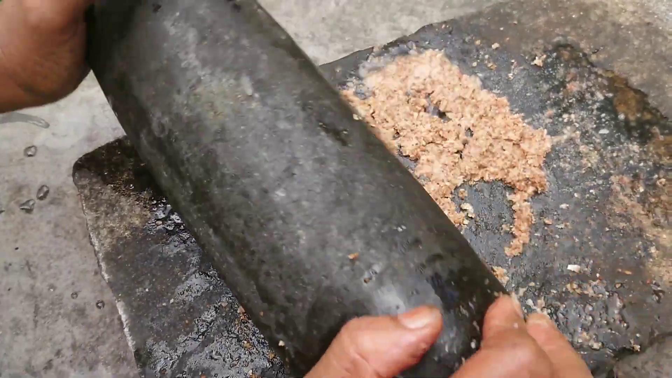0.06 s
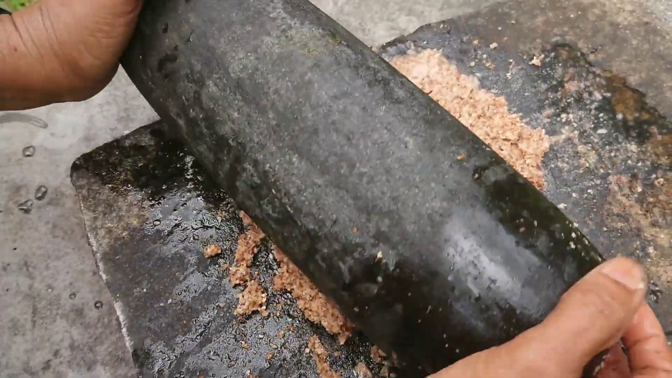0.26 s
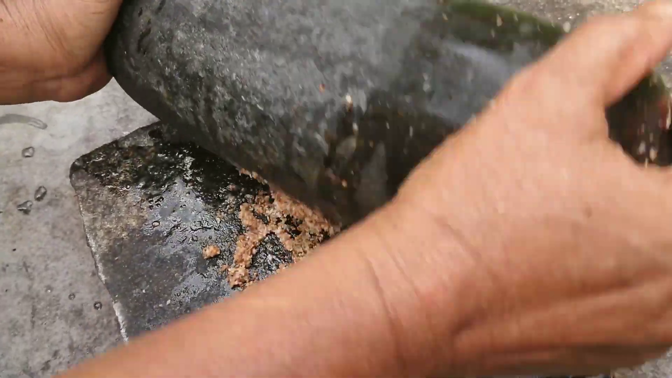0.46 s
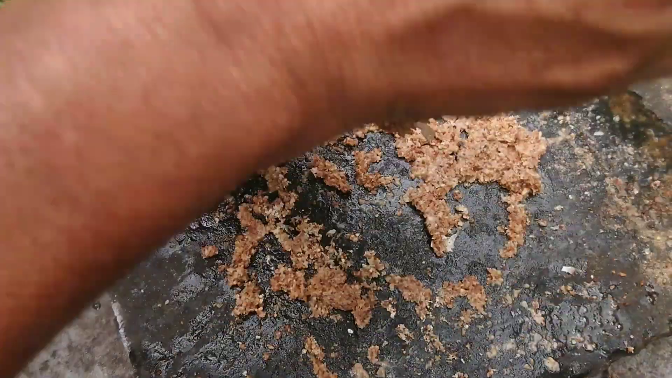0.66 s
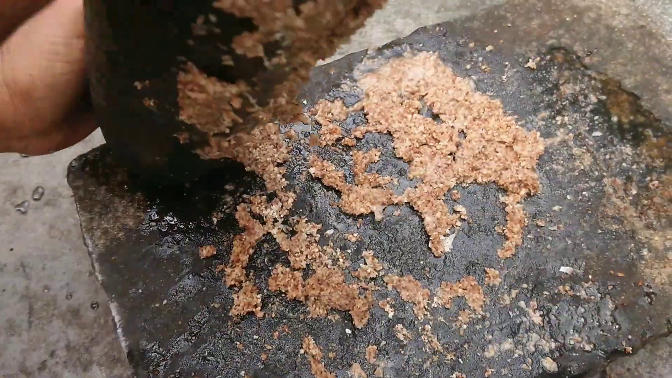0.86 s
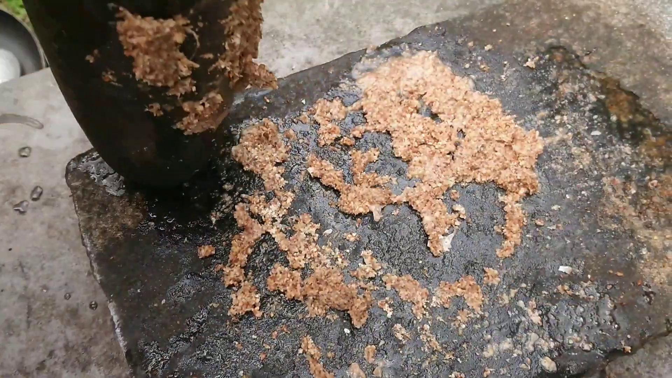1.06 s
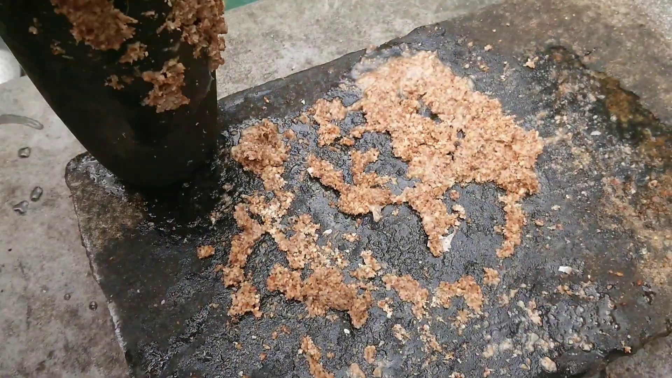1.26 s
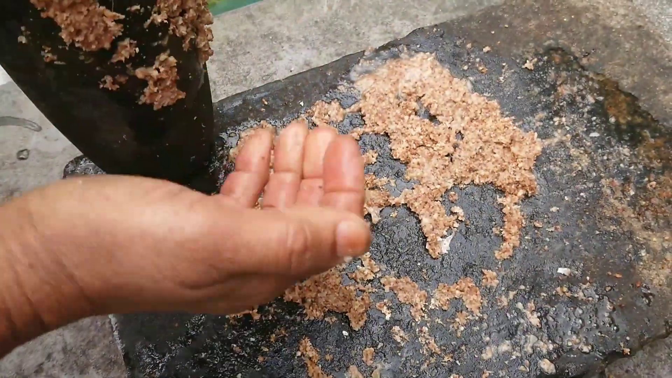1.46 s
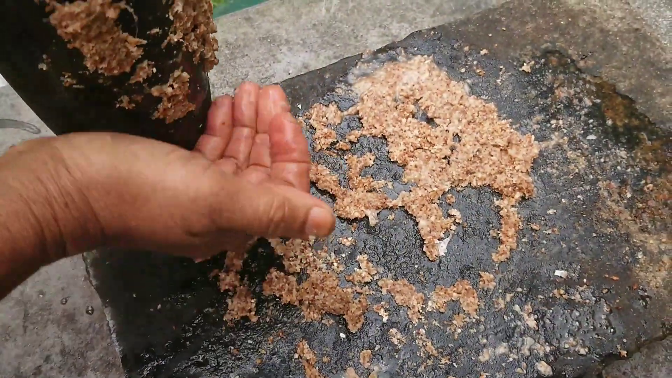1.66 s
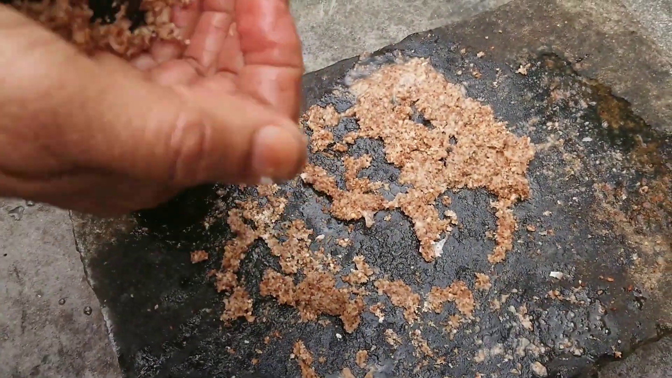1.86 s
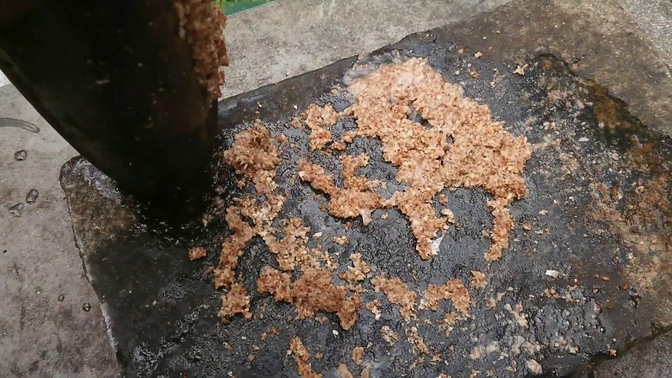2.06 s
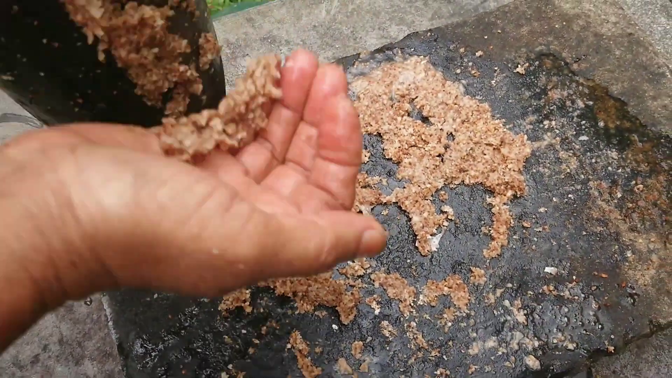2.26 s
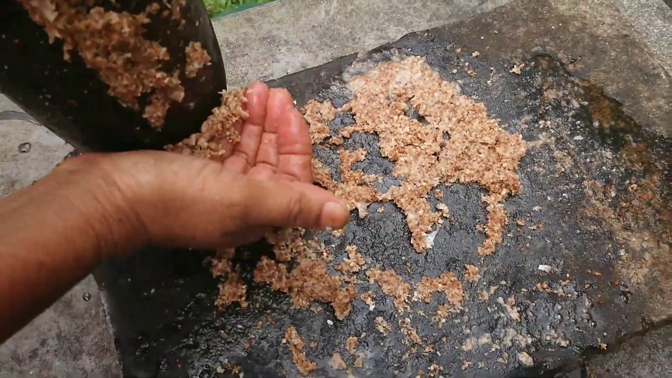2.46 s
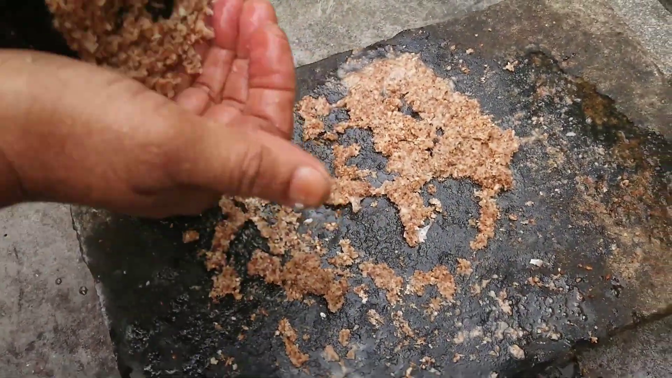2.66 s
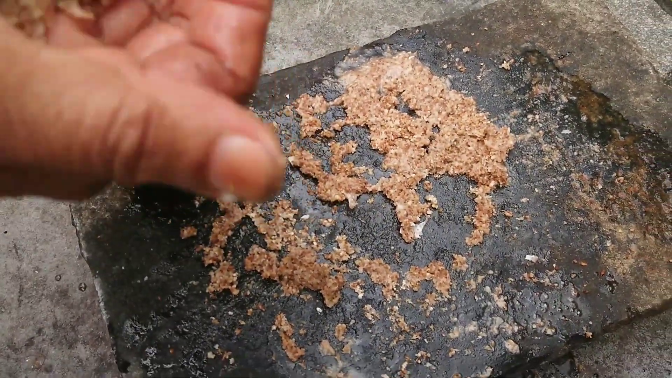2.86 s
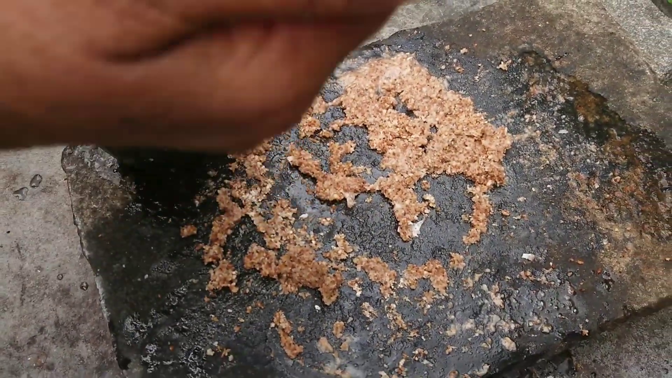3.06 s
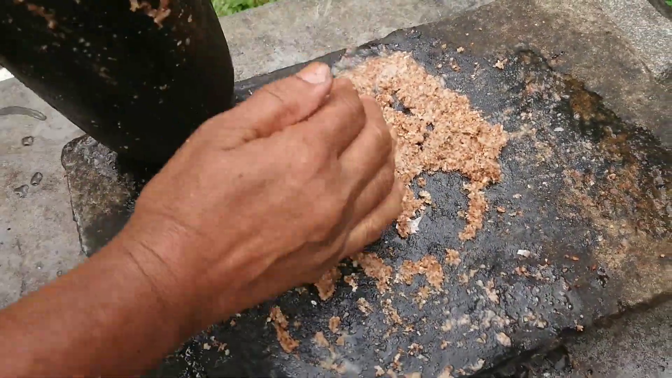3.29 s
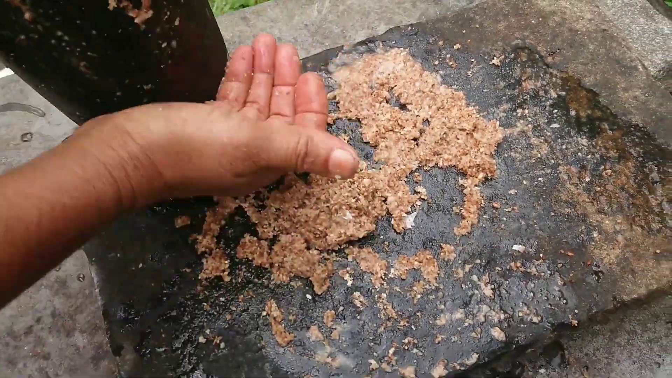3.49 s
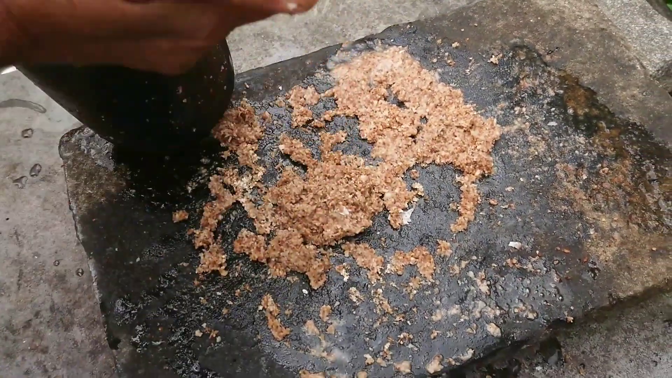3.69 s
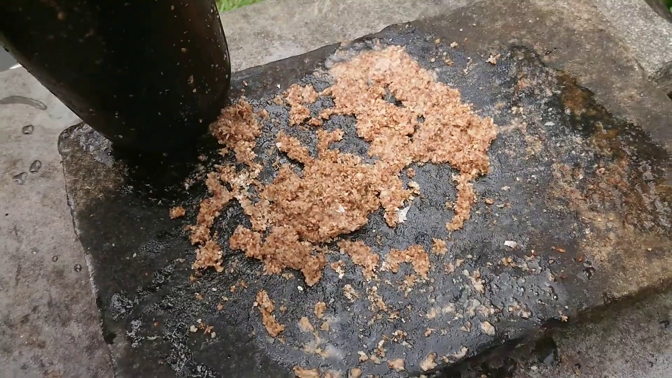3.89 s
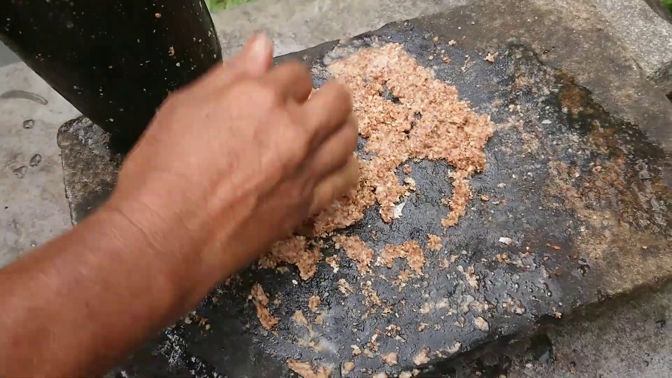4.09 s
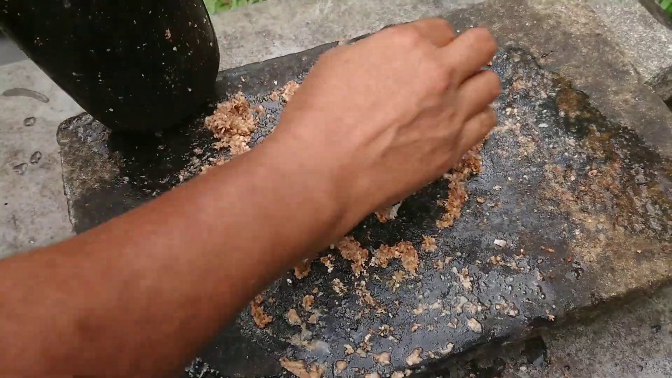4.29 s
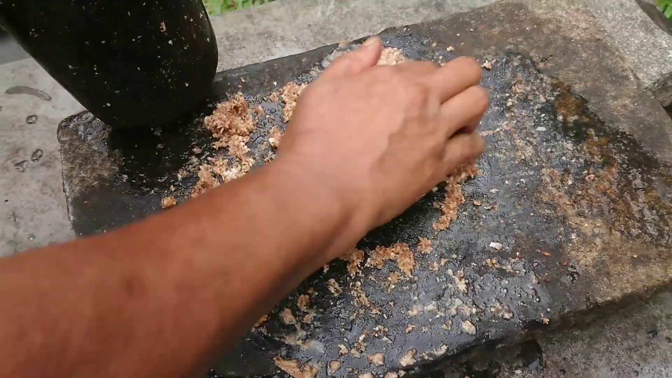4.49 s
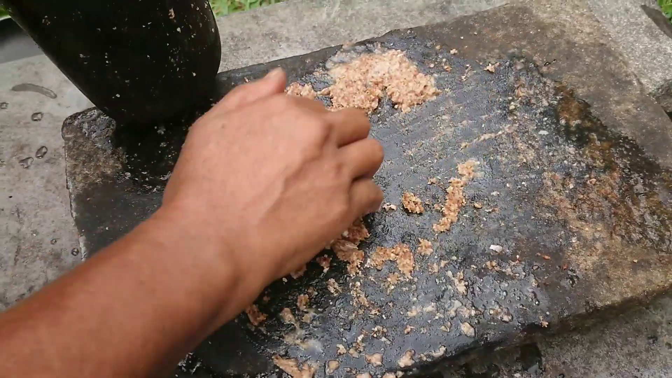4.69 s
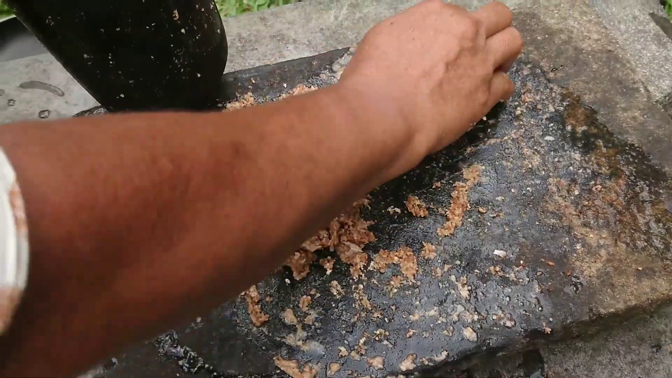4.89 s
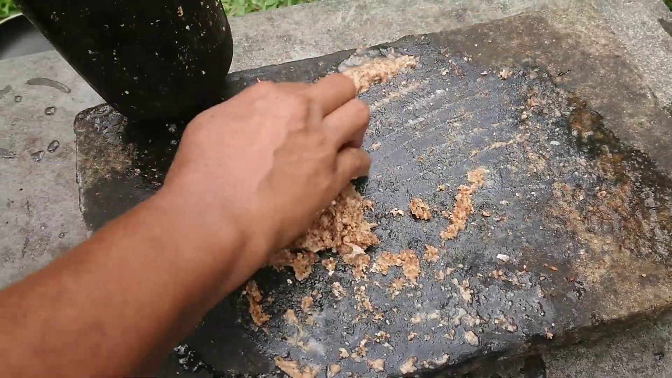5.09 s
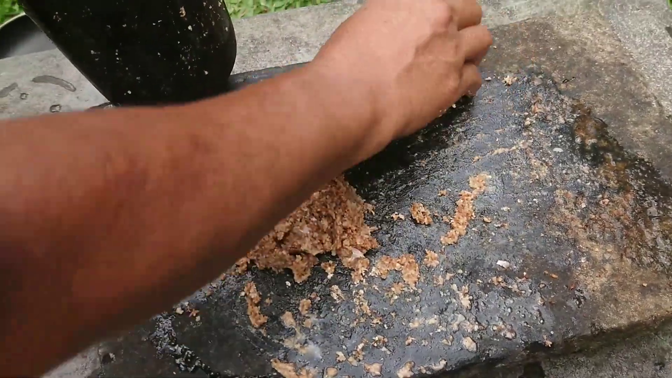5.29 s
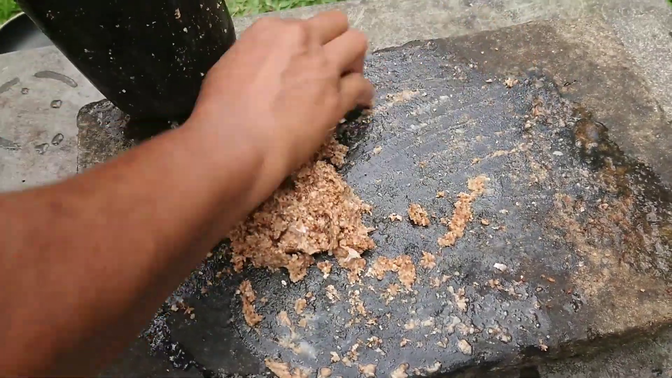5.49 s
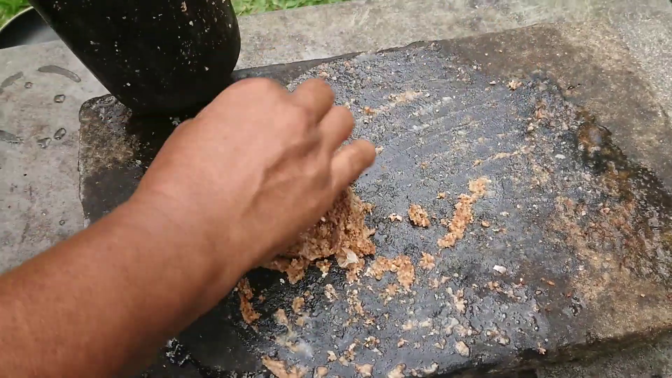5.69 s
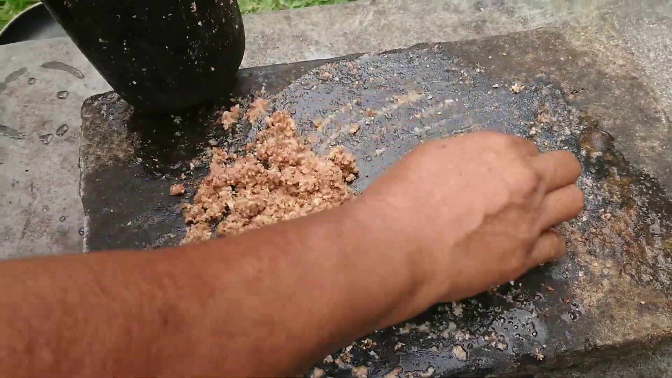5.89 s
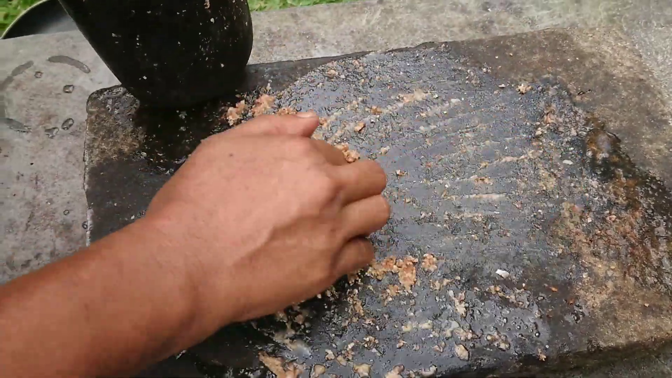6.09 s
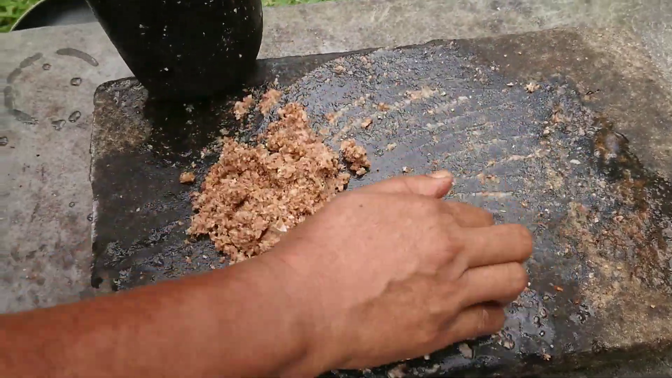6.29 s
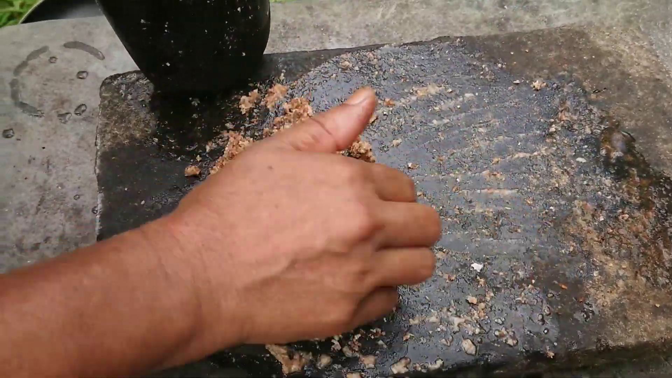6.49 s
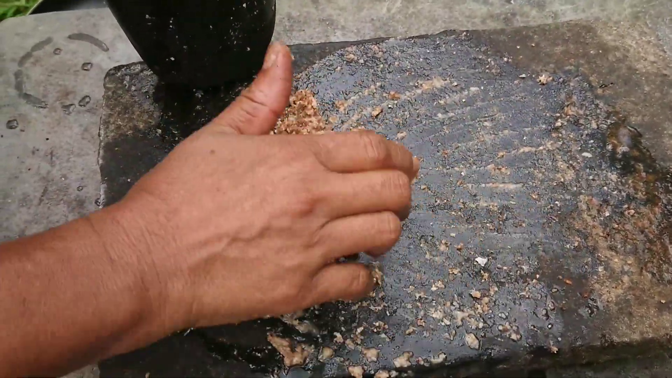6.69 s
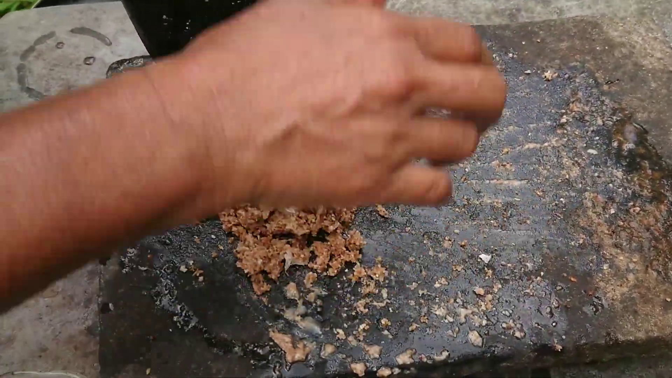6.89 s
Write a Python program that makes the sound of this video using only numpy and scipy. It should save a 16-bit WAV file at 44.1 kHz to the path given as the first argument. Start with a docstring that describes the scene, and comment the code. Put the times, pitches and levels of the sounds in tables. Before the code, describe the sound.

A stone roller scrapes and knocks dully on a slab, then a hand wipes up wet, gritty paste outdoors amid hissing insects.

```python
"""Outdoors, at a stone slab, heard close up through the two microphone ports of a phone.
A stone roller grinds wet paste, drags as it is tipped up and is set on end with a few dull knocks,
the stones ringing briefly. A hand wipes the paste off and sweeps it together, squelching and gritty.
Moving air buffets the left port. Insects hiss all around; far off, one rasps and a bird calls
over a low rumble and hush."""
import sys
import numpy as np
from scipy import signal
from scipy.fft import rfft, irfft
from scipy.io import wavfile
from scipy.ndimage import uniform_filter1d

SR = 44100
rng = np.random.default_rng(int(sys.argv[2]) if len(sys.argv) > 2 else 0)


def to_wav(s):
    """Save 16-bit WAV."""
    ch = np.atleast_2d(s).T  # columns
    pcm = np.round(np.clip(ch, -1, 1) * 32767)  # PCM
    wavfile.write(sys.argv[1], SR, pcm.astype(np.int16))


N = 306435
T = np.arange(N) / SR
FREQS = np.fft.rfftfreq(N, 1 / SR)


def undb(db):
    """Decibels to gain."""
    return 10 ** (np.asarray(db) / 20)


def unit(x):
    """Scale to rms 1."""
    return x / np.sqrt(np.mean(x ** 2))


def response(points, freqs):
    """Gain of a (Hz, dB) spectrum at the given frequencies."""
    hz, db = np.transpose(points)
    return undb(np.interp(np.log(freqs + 1), np.log(hz), db))


def colour(x, gain):
    """Filter by a gain per frequency, to rms 1."""
    return unit(irfft(rfft(x) * gain, len(x)))


def cut(x, hz, kind, order=2):
    """Low-pass or high-pass."""
    return signal.sosfilt(signal.butter(order, min(hz, .45 * SR), kind, fs=SR, output="sos"), x)


def resonate(x, hz, width_hz):
    """Ring a resonance whose centre may glide, to rms 1."""
    turn = np.exp(2j * np.pi * np.cumsum(hz * np.ones(len(x))) / SR)
    return unit(np.real(cut(x / turn, width_hz / 2, "low") * turn))


def noise():
    """White noise."""
    return rng.standard_normal(N)


def walk(hz):
    """A random wander of rms 1, mostly slower than hz."""
    return colour(noise(), np.exp(-(FREQS / hz) ** 2))


def grains(per_s, spread_db, size=N):
    """Random tiny clicks of uneven strength."""
    chance, sign, loud = rng.random(size), rng.standard_normal(size), rng.standard_normal(size)
    return unit((chance < per_s / SR) * np.sign(sign) * undb(spread_db * np.clip(loud, -2, 2)))


def held(start, end, attack_s, release_s):
    """Rise from the start, hold to the end, then fall silent."""
    return np.clip((T - start) / attack_s, 0, 1) * np.clip(1 - (T - end) / release_s, 0, 1)


def progress(start, end):
    """From 0 to 1 over a gesture, one value a sample."""
    return np.linspace(0, 1, int((end - start) * SR))


def add(out, s, x):
    """Mix a short sound in at s seconds."""
    i = max(int(s * SR), 0)
    out[i:i + len(x)] += x[:N - i]


def ports(x, right_db, slant=1):
    """Sound bends round the phone to the right port; the lag grows with its slant to the left."""
    # Each row: frequency in Hz, phase lag at the right port in radians, gain there in dB.
    body_shadow = [(20, 1.5, -14), (250, 0, -6.5), (473, 0.5, -7), (820, 0.97, 0.5), (1070, 1.4, -12),
                   (1584, 3, -2), (2150, 5, -4), (2820, 4, -6.5), (3280, 10, -0.5), (5400, 14, -4.5),
                   (10100, 19, -9), (16200, 29, -3)]
    hz, lag, db = np.transpose(body_shadow)
    gain = undb(right_db + np.interp(FREQS, hz, db))
    delay = np.exp(-1j * slant * np.interp(FREQS, hz, lag))
    return np.array([x, irfft(rfft(x) * gain * delay, N)])


def outdoors(db=-49.5, right_db=-4, shared_hz=550, shade_hz=1100, swell_db=1, patchy_db=1.5):
    """Far rumble, alike at both ports, under a diffuse hush whose bands swell and fade on their own."""
    # The distant background. Each row: frequency in Hz, level in dB.
    hush = [(20, -38), (35, -25.5), (55, 7.5), (90, -1), (160, -10.5), (300, -19), (600, -22.5),
            (1100, -25), (1500, -25.5), (2500, -26), (5000, -31), (9500, -32), (12000, -44.5), (16000, -54)]
    shape = unit(response(hush, FREQS))
    alike = .85 / (1 + (FREQS / shared_hz) ** 4)
    common = np.sqrt(alike) * rfft(noise())
    left, right = (shape * (common + np.sqrt(1 - alike) * rfft(noise())) for _ in range(2))
    pair = np.array([left, right * undb(right_db / (1 + (FREQS / shade_hz) ** 4))])
    half_octaves = 2 * np.log2(np.clip(FREQS, 250, 8000) / 250)
    bands = (irfft(pair * np.maximum(1 - np.abs(half_octaves - k), 0), N) for k in range(11))
    return undb(db + swell_db * walk(4.4)) * sum(band * undb(patchy_db * walk(16)) for band in bands)


def bird(blur=0.53, third_db=-12, waver=0.016):
    """Soft, wavering calls from far off; mostly the second harmonic carries, its level blurred."""
    # Each row: start and end in seconds, first and last fundamental in Hz, level in dB.
    calls = [(1.1, 1.22, 707, 710, -64.5), (2.372, 2.47, 710, 720, -72), (6.077, 6.292, 589, 578, -61),
             (6.627, 6.848, 627, 597, -54)]
    out = np.zeros(N)
    drift = 1 + waver * walk(70)
    for start, end, first_hz, last_hz, db in calls:
        u = np.clip((T - start) / (end - start), 0, 1)
        phase = 2 * np.pi * np.cumsum((first_hz + (last_hz - first_hz) * u) * drift) / SR
        out += undb(db) * np.sin(np.pi * u) * (np.sin(2 * phase) + undb(third_db) * np.sin(3 * phase))
    return ports(out * (1 + blur * walk(140)), right_db=8.5, slant=0.67)


def insect_chorus(db=-56.5, flutter_db=1, swell_db=0.17):
    """Insects all around, too dense to tell apart, different at each port."""
    # Their hiss. Each row: frequency in Hz, level in dB.
    hiss = [(5000, -23.5), (5900, -24), (6450, -1), (7100, 3.5), (7600, 0), (8100, -8.5), (9000, -39),
            (11000, -45)]
    shape = response(hiss, FREQS)
    return np.array([colour(noise(), shape) * undb(db + flutter_db * walk(50) + swell_db * walk(0.88))
                     for _ in range(2)])


def rasping_insect(first_hz=3074, waver_hz=30, skirt_db=-7, falter_db=1.5):
    """One far insect, lower than the chorus; each rasp starts on the same pitch, wavers and sinks."""
    # Each row: start and end in seconds, level in dB, sag in Hz per second, bandwidth in Hz.
    rasps = [(-.1, 0.659, -64.5, 35.7, 90), (3.738, 6.0, -63.5, 105, 270)]
    out = np.zeros((2, N))
    waver, effort = waver_hz * walk(7.2), undb(falter_db * walk(20))
    for start, end, db, sag, width_hz in rasps:
        envelope = effort * held(start, end, attack_s=0.042, release_s=0.4)
        span = envelope > 0
        hz = (first_hz - sag * (T - start) + waver)[span]
        rasp = [resonate(x, hz, width_hz) + undb(skirt_db) * resonate(x, hz, 4 * width_hz)
                for x in rng.standard_normal((2, len(hz)))]
        out[:, span] += undb(db) * envelope[span] * unit(np.array(rasp))
    return out


def wind(right_db=-20, port_hz=62, fitful_db=3, puff_db=-2):
    """Eddies and single puffs press on the left port; the port's low cut makes each puff swing back."""
    # Light air that always stirs. Each row: time in seconds, level in dB.
    light_air = [(0, -38), (.7, -41.5), (1.1, -44.5), (1.45, -62), (1.9, -41.5), (2.25, -52.5), (3, -51),
                 (3.8, -44.5), (4, -60), (5.7, -64), (6.2, -42.5), (6.5, -64), (6.95, -56)]
    # Each row: start and length in seconds, level in dB.
    gusts = [(-.02, 0.025, -17.5), (0.277, 0.094, -24), (0.722, 0.028, -33), (0.919, 0.081, -24.5),
             (1.05, 0.033, -36.5), (1.156, 0.027, -33.5), (1.649, 0.13, -30.5), (1.943, 0.028, -27.5),
             (2.05, 0.082, -38), (2.864, 0.061, -33.5), (3.419, 0.045, -24.5), (3.497, 0.28, -34.5)]
    # Eddies on a port. Each row: frequency in Hz, level in dB.
    eddy_spectrum = [(20, -48), (35, -9.5), (55, 9), (75, 5), (130, -7.5), (200, -17), (320, -37.5),
                     (600, -49), (2000, -62)]
    # Single puffs. Each row: time in seconds, relative level in dB, cut-off in Hz.
    buffets = [(.003, -14, 236), (0.236, -30, 260), (0.335, -16.5, 199), (0.362, -15, 176),
               (0.461, -32.5, 119), (0.985, -12, 202), (1.008, -22.5, 100), (1.313, -31, 242),
               (1.682, -19, 174), (1.72, -25, 120), (1.757, -23.5, 169), (1.895, -36, 159),
               (1.96, -25.5, 250), (1.97, -17, 280), (2.038, -40, 480), (2.36, -32.5, 166),
               (2.539, -37, 150), (2.679, -32.5, 115), (2.885, -38, 188), (3.098, -31, 130),
               (3.282, -30, 109), (3.438, -21.5, 137), (3.453, -20.5, 169), (3.588, -21, 190),
               (3.737, -27, 162), (6.115, -30, 108), (6.163, -36, 110), (6.227, -24.5, 123)]
    stir = undb(np.interp(T, *np.transpose(light_air)) + fitful_db * walk(25))
    gusting = sum(undb(db) * held(s, s + length, attack_s=0.0093, release_s=0.025)
                  for s, length, db in gusts)
    strength = np.hypot(stir, gusting)
    eddies = np.array([colour(noise(), response(eddy_spectrum, FREQS)) for _ in range(2)])
    eddies /= np.sqrt(uniform_filter1d(eddies ** 2, SR // 25, axis=1))  # even out their own swells
    puffs = np.zeros(N)
    for s, db, hz in buffets:
        push = cut(signal.unit_impulse(SR // 8), hz, "low", order=5)
        puff = cut(push, port_hz, "high", order=3)
        add(puffs, s - .003, undb(puff_db + db) * puff / np.abs(puff).max())
    return np.array([strength * eddies[0] + puffs, undb(right_db) * strength * eddies[1]])


def crumbs(size, tilt_db, spread_db):
    """Countless wet crumbs parting, brighter or duller by the tilt in dB per octave."""
    # Wet paste. Each row: frequency in Hz, level in dB.
    paste_spectrum = [(200, 8), (600, -3.5), (1300, -1), (1850, -2.5), (2500, 0.5), (4000, -1.5),
                      (5200, -3.5), (7000, 2), (9500, 1), (12000, -4.5), (16000, -10)]
    freqs = np.fft.rfftfreq(size, 1 / SR)
    gain = response(paste_spectrum, freqs) * undb(tilt_db * np.log2((freqs + 100) / 4000))
    return colour(grains(per_s=7000, spread_db=spread_db, size=size), gain)


def grit(crumb_db=2, ring_width_hz=900):
    """Grit cracks and paste smacks under stone or fingers, each burst with a short ring of its own."""
    # Each row: start in seconds, level in dB, rise in seconds, ring in Hz, relative ring level in dB.
    bursts = [(.09, -39.5, .0014, 8000, -7), (.102, -39.5, 0.0031, 7350, -3),
              (.114, -39, 0.0048, 5560, -10), (0.1233, -41.5, 0.0013, 3680, 3.5),
              (.128, -49, .0012, 3800, -2), (.831, -42, 0.0016, 4400, -14), (3.2588, -49.5, .0008, 3100, 6),
              (3.2642, -46, .0013, 3050, -2), (3.267, -40, 0.0022, 3500, -4),
              (5.034, -48.5, 0.0008, 7000, -4), (6.622, -48.5, 0.00096, 7000, -16),
              (6.825, -49, 0.0028, 9500, -6)]
    out, t = np.zeros(N), T[:SR // 25]
    for s, db, rise_s, ring_hz, ring_db in bursts:
        crack = crumbs(len(t), 0, crumb_db)
        ring = undb(ring_db) * resonate(rng.standard_normal(len(t)), ring_hz, ring_width_hz)
        envelope = t / rise_s * np.exp(1 - t / rise_s)
        add(out, s, undb(db) * envelope * (crack + ring))
    return out


def hand(arch_power=0.79, crumb_db=3, sticky_db=1.5, wipe_release_s=0.17):
    """Strokes, wipes and their squelches, all uneven as the skin sticks and lets go."""
    # Short strokes through the paste.
    # Each row: start and end in seconds, level in dB, treble tilt in dB per octave.
    strokes = [(0.05, 0.167, -41.5, -3.5), (0.126, 0.292, -50.5, 0), (0.946, 1.064, -56.5, 5),
               (1.253, 1.363, -55, -2), (2.12, 2.38, -69, 3), (2.972, 3.092, -64, 4),
               (3.224, 3.308, -55.5, 0), (4.497, 4.73, -54, 1), (4.997, 5.172, -58.5, 0),
               (5.468, 5.717, -60, -0.5), (5.99, 6.12, -55.5, 1.5), (6.333, 6.494, -58, -0.5)]
    # Long wipes that gather a handful. Each row: as for a stroke, then growth in dB per second.
    wipes = [(1.7, 1.979, -49, 0.5, 4), (2.545, 2.906, -51, 0.9, 10), (3.55, 3.82, -54, 1, -3)]
    # Pockets between skin, paste and stone ring and change size as the hand slides.
    # Each row: start and end in seconds, first pitch, last pitch and bandwidth in Hz, level in dB.
    squelches = [(1.251, 1.346, 1090, 800, 600, -59.5), (1.257, 1.347, 2520, 2580, 220, -61),
                 (1.255, 1.345, 4680, 4700, 560, -59.5), (1.703, 1.813, 1710, 1230, 260, -53.5),
                 (1.728, 1.842, 2900, 2200, 400, -62), (1.91, 2.083, 5300, 4800, 550, -57),
                 (2.56, 2.86, 1300, 1150, 260, -62), (2.68, 2.94, 2650, 2300, 350, -58.5),
                 (2.658, 2.897, 5500, 4300, 900, -59), (2.858, 2.985, 4200, 4400, 800, -56),
                 (3.569, 3.766, 1590, 1300, 400, -63), (3.76, 3.92, 5000, 4700, 550, -67),
                 (4.52, 4.7, 1950, 2100, 550, -58), (4.527, 4.678, 2930, 3080, 900, -56),
                 (5.0, 5.156, 1570, 1880, 990, -56.5), (5.03, 5.13, 2920, 2900, 700, -54.5),
                 (5.459, 5.68, 1620, 1550, 700, -59), (5.527, 5.668, 2500, 2700, 900, -58.5),
                 (6.331, 6.49, 1400, 1450, 500, -65.5)]
    out = np.zeros(N)
    for start, end, db, tilt_db in strokes:
        u = progress(start, end)
        add(out, start, undb(db) * np.sin(np.pi * u) ** arch_power * crumbs(len(u), tilt_db, crumb_db))
    for start, end, db, tilt_db, growth_db in wipes:
        span = (T >= start) & (T < end + wipe_release_s)
        press = held(start, end, attack_s=0.041, release_s=wipe_release_s)[span] ** 2
        press *= undb(growth_db * (T[span] - (start + end) / 2))
        add(out, start, undb(db) * press * crumbs(len(press), tilt_db, crumb_db))
    for start, end, first_hz, last_hz, width_hz, db in squelches:
        u = progress(start, end)
        squelch = resonate(rng.standard_normal(len(u)), first_hz + (last_hz - first_hz) * u, width_hz)
        add(out, start, undb(db) * np.sin(np.pi * u) ** arch_power * squelch)
    return out * undb(sticky_db * walk(29))


def paste():
    """The wet paste and its grit lie all over the slab, so the lag between the ports keeps shifting."""
    left, right = ports(hand() + grit(), right_db=-0.5, slant=0.47)
    shifting_phase = np.exp(1j * walk(460))
    return np.array([left, np.real(signal.hilbert(right) * shifting_phase)])


def stone_ring(t, rubbed):
    """The stones' modes dying away after one blow or one slip."""
    # Each row: frequency in Hz, level struck and level rubbed in dB, seconds to fall by 60 dB.
    modes = [(225, -66, -7, 0.039), (403, -9, -17, 0.023), (460, -15.5, 1, 0.036), (970, -30, -13, 0.031),
             (1242, -17, -12.5, 0.036), (1545, -14.5, -14, 0.026), (2350, -19, -27, 0.014),
             (3125, -15, -20, .055), (3152, -15, -20, .055), (4970, -28, -11, .1), (5475, -25, -26, 0.11),
             (6115, -13.5, -36.5, 0.06), (10680, -32, -22, 0.035)]
    return sum(undb((rub_db if rubbed else hit_db) - 60 * t / t60) * np.sin(2 * np.pi * hz * t)
               for hz, hit_db, rub_db, t60 in modes)


def roller(drag_db=-51, squeal_hz=4930, squeal_db=-68, squeal_rough=0.3, catch_db=4):
    """The tipped roller's edge drags in tiny jerks that keep the stones ringing; it squeals in fits."""
    # The sharper slips. Each row: start in seconds, level in dB, contact cut-off in Hz.
    slips = [(0.448, -37, 5600), (.512, -34, 900), (0.541, -45, 2000), (.560, -34, 1000),
             (0.57, -36.5, 7000), (0.594, -44.5, 4000)]
    ring = stone_ring(T[:SR // 4], rubbed=True)
    grinding = unit(signal.fftconvolve(grains(per_s=400, spread_db=4), ring)[:N])
    rough_tone = np.sin(2 * np.pi * squeal_hz * T) * (1 + squeal_rough * walk(90))
    squeal = unit(rough_tone * undb(catch_db * np.clip(walk(25), -2, 1)))
    drag = held(start=0.411, end=0.579, attack_s=0.013, release_s=0.04)
    out = drag * (undb(drag_db) * grinding + undb(squeal_db) * squeal)
    for s, db, contact_hz in slips:
        add(out, s, undb(db) * cut(ring, contact_hz, "low"))
    return ports(out, right_db=3.5)


def slab_clack(t):
    """The slab's dead answer to one contact, to peak 1."""
    # Each row: frequency in Hz, level in dB.
    clack_spectrum = [(100, -19.5), (250, -2), (420, 10.5), (750, 2), (1020, 1), (1300, 2), (1650, 12.5),
                      (2030, -7), (2400, 2.5), (2800, -4), (4000, -11), (6000, -9.5), (12000, -67)]
    cepstrum = irfft(np.log(response(clack_spectrum, np.fft.rfftfreq(len(t), 1 / SR))))
    causal = (1 + np.sign(t)) * (t < t[-1] / 2)  # minimum phase: all of it follows the contact
    clack = irfft(np.exp(rfft(cepstrum * causal)))
    return clack / np.abs(clack).max()


def disperse(x, hz, stages):
    """Bending waves in a slab: the treble arrives first, the bass a little later."""
    pole = np.exp(-2 * np.pi * hz / SR)
    return signal.sosfilt([[-pole, 1, 0, 1, -pole, 0]] * stages, x)


def knocks(db=1, scatter_db=-29, scatter_t60=0.044, yard_db=-62, yard_t60=0.74, bend_hz=1300):
    """Stone meets stone close by: a dead clack, near reflections, a faint tail and a brief ring."""
    # Contacts on the slab, the first four a quick chatter. Each row: start in seconds, level in dB,
    # contact cut-off and low cut in Hz, relative ring level in dB.
    contacts = [(0.3674, -10.5, 1550, 560, 1.5), (.3702, -17, 1720, 450, 7.5),
                (0.3727, -9.5, 1580, 810, -0.5), (0.3752, -18, 1700, 800, 3), (0.8323, 2, 2920, 308, -7.5),
                (0.8656, -3, 1910, 285, -4.5), (0.8799, -11, 1500, 300, 0.5),
                (6.8262, -25.5, 1000, 480, -16), (6.8298, -21.5, 2000, 560, -30)]
    out, t = np.zeros(N), T[:2 ** 14]
    clack, ring = slab_clack(t), stone_ring(t, rubbed=False)
    echo_decay = undb(scatter_db - 60 * t / scatter_t60) + undb(yard_db - 60 * t / yard_t60)
    for s, hit_db, contact_hz, low_hz, ring_db in contacts:
        paths = rng.standard_normal(len(t)) * echo_decay * (t > .0015)
        paths[0] = 1  # straight to the microphone
        blow = signal.fftconvolve(paths, clack)[:len(t)] + undb(ring_db) * ring
        dulled = cut(blow, contact_hz, "low", order=3)
        add(out, s, undb(hit_db) * cut(dulled, low_hz, "high", order=3))
    return ports(undb(db) * disperse(out, bend_hz, stages=4), right_db=0.5)


def scene():
    """All sources at the two ports, from near to far."""
    near = knocks() + roller() + paste() + wind()
    far = insect_chorus() + rasping_insect() + bird() + outdoors()
    return (near + far) * np.minimum(T / .003, 1)


def record(dry, low_hz=37, top_hz=15800):
    """The right port has notches in its treble; the phone cuts the deepest rumble and the top."""
    # The right port's colour. Each row: frequency in Hz, gain in dB.
    right_port = [(8000, 0.5), (9500, -9.5), (10700, 4), (11500, -27), (12400, 2.5), (14000, -1)]
    pair = np.array([dry[0], irfft(rfft(dry[1]) * response(right_port, FREQS), N)])
    top_cut = signal.ellip(10, .2, 70, top_hz, fs=SR, output="sos")
    return signal.sosfilt(top_cut, cut(pair, low_hz, "high", order=4))


dry = scene()
out = record(dry)
to_wav(out)
```